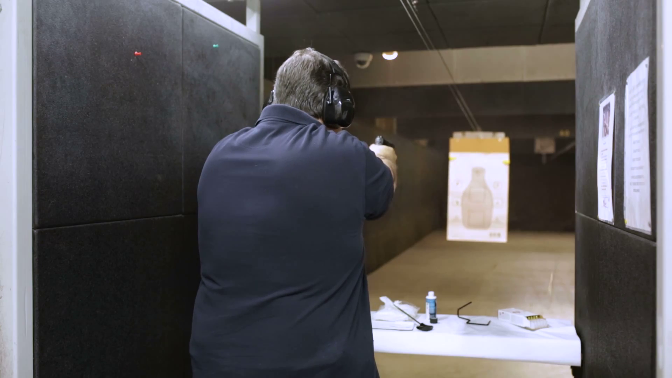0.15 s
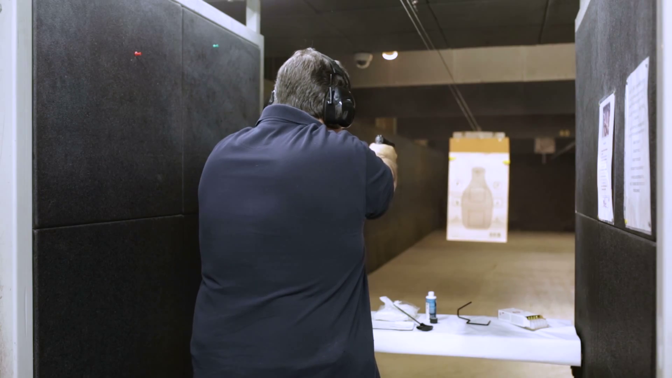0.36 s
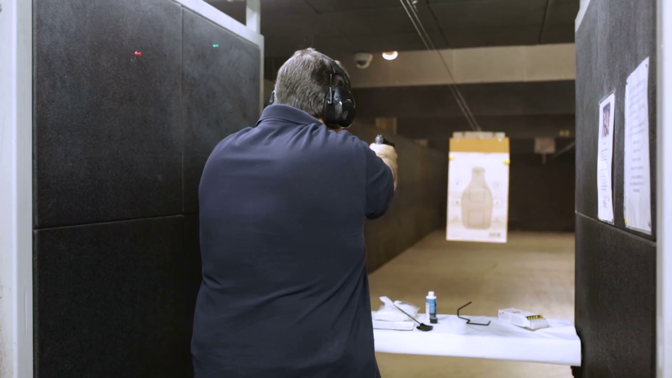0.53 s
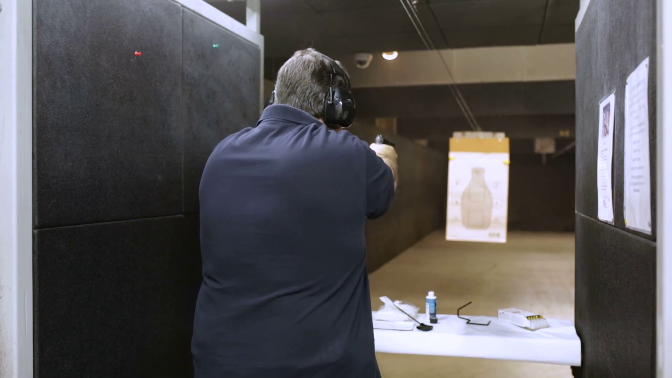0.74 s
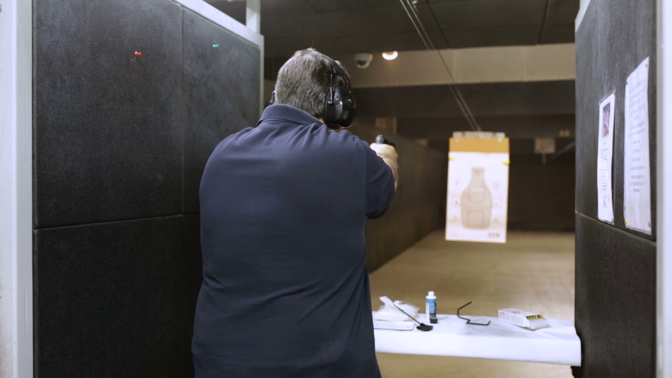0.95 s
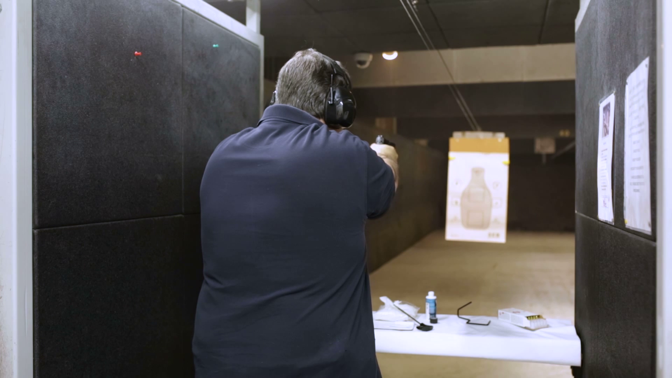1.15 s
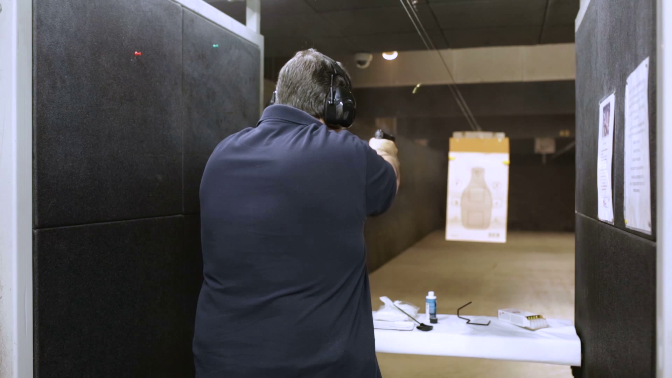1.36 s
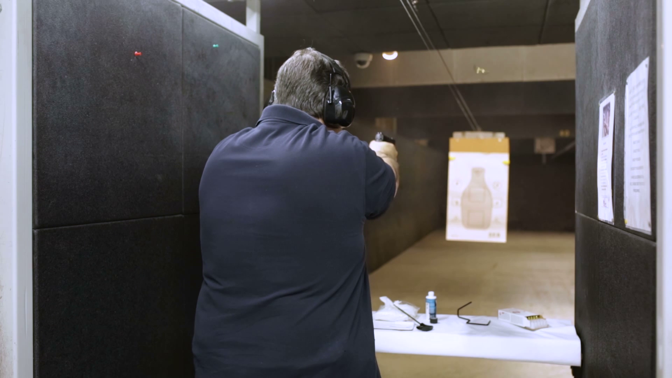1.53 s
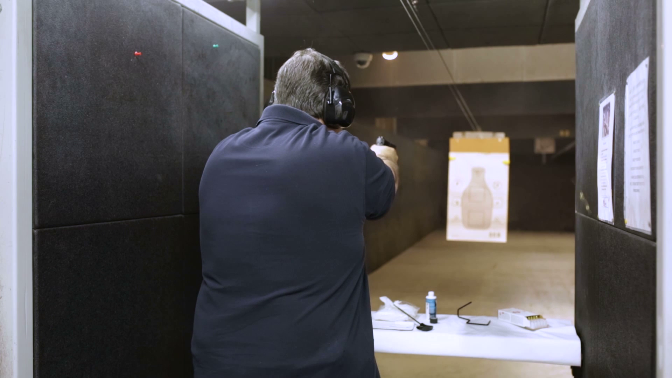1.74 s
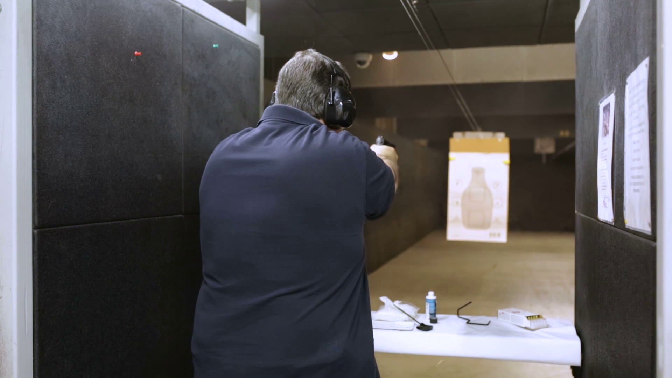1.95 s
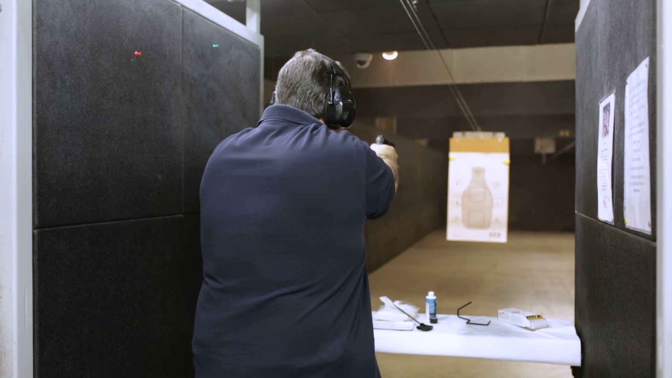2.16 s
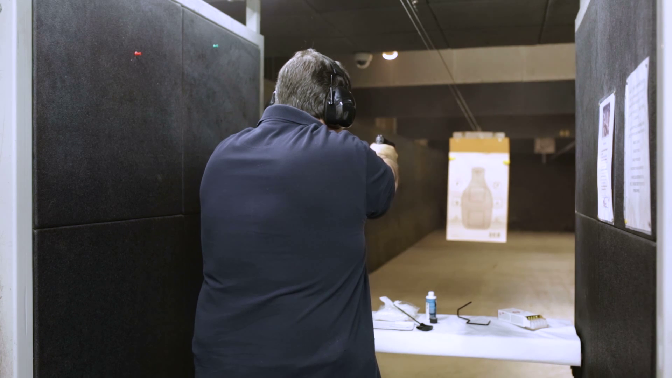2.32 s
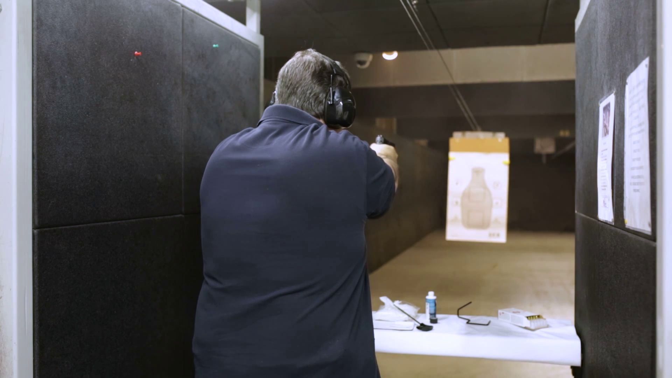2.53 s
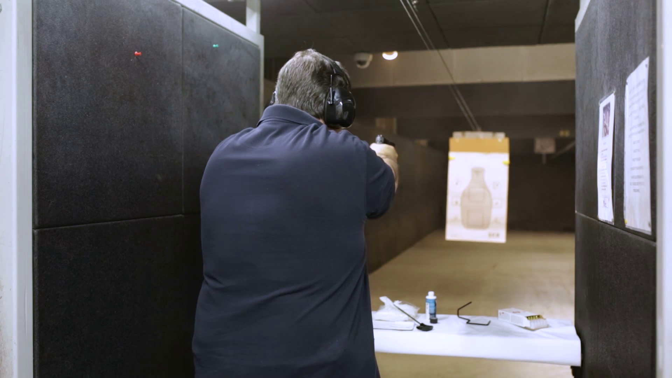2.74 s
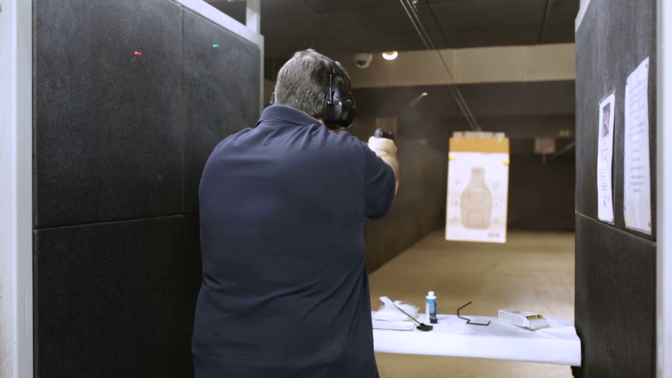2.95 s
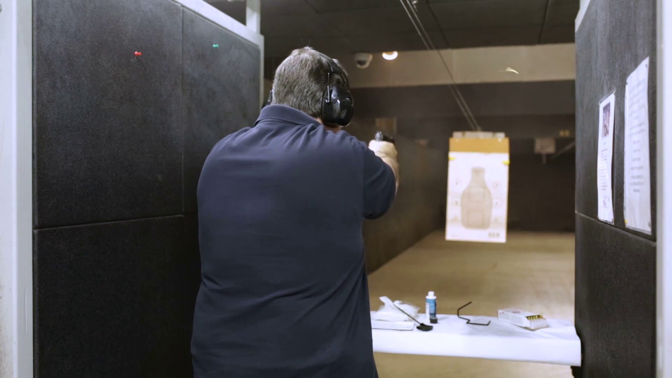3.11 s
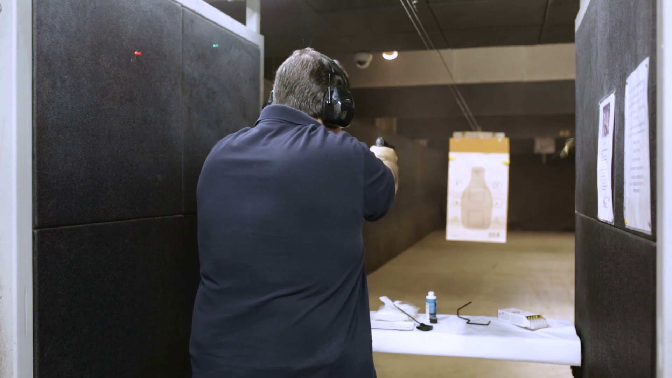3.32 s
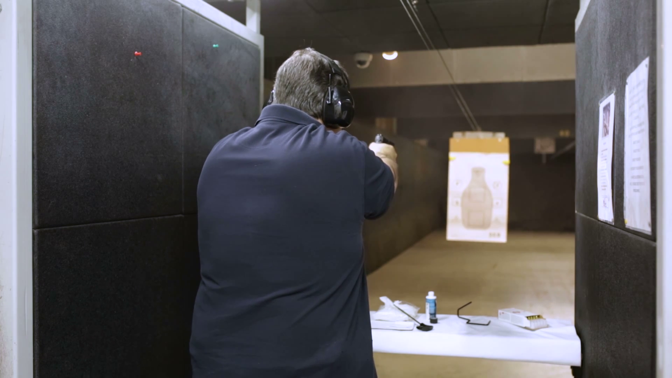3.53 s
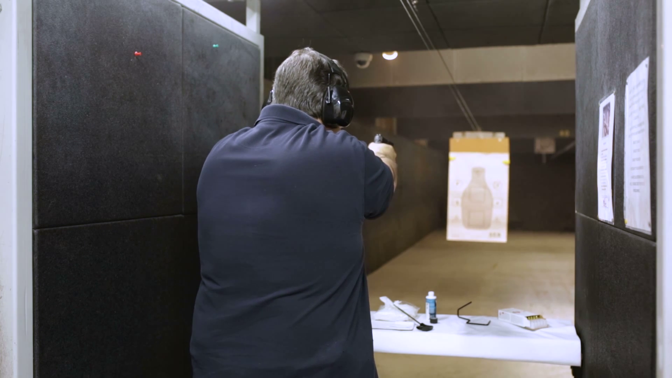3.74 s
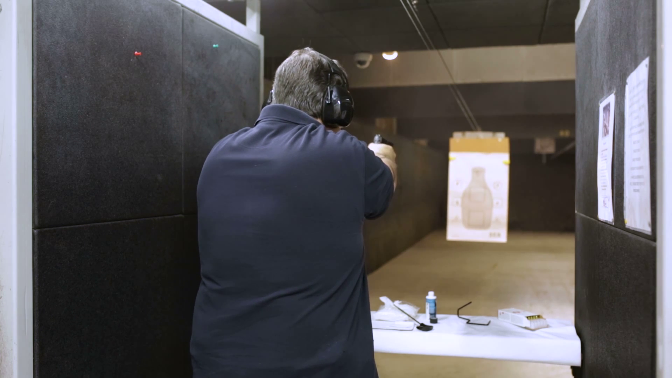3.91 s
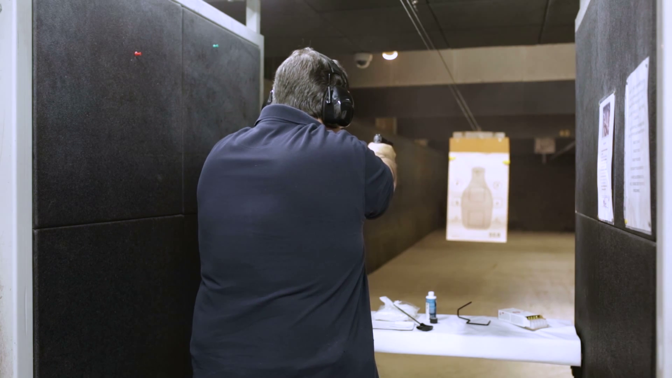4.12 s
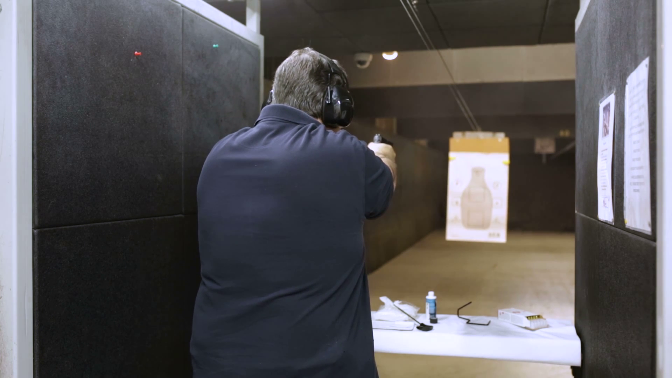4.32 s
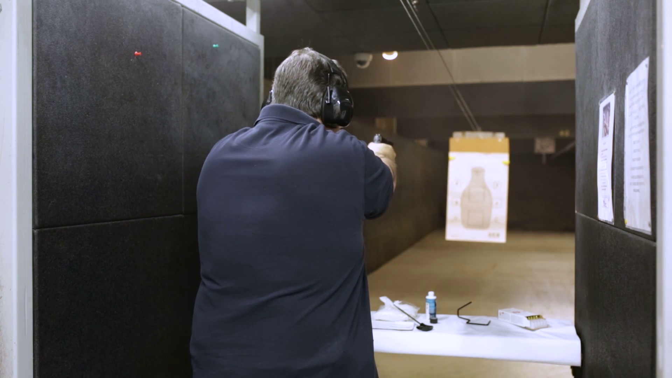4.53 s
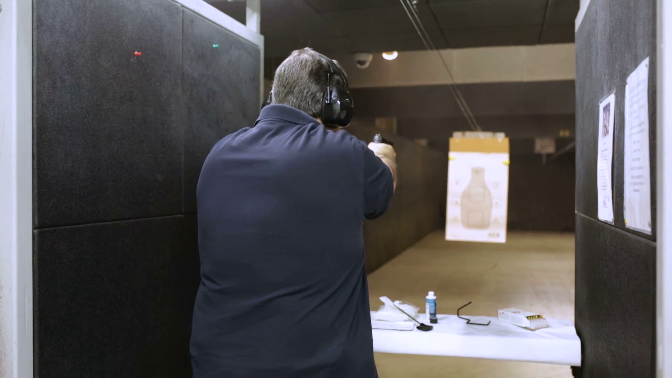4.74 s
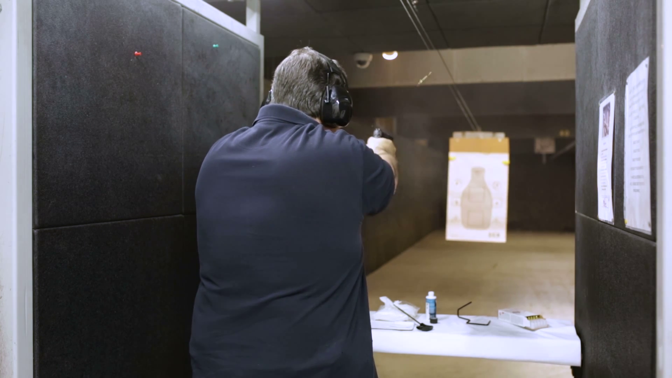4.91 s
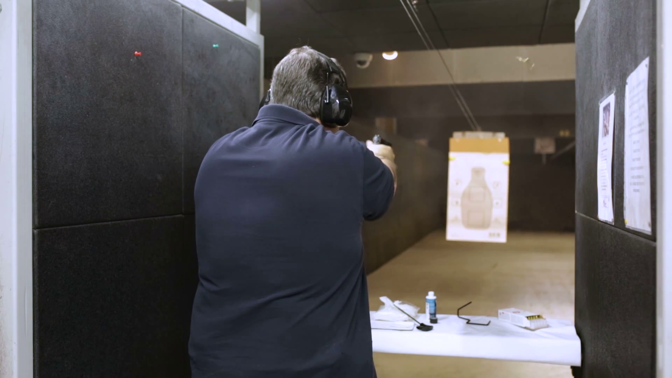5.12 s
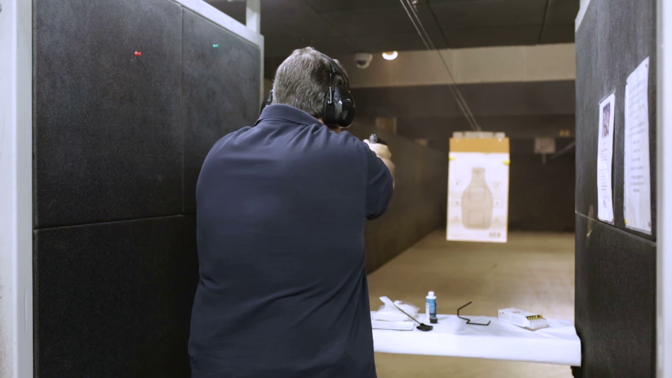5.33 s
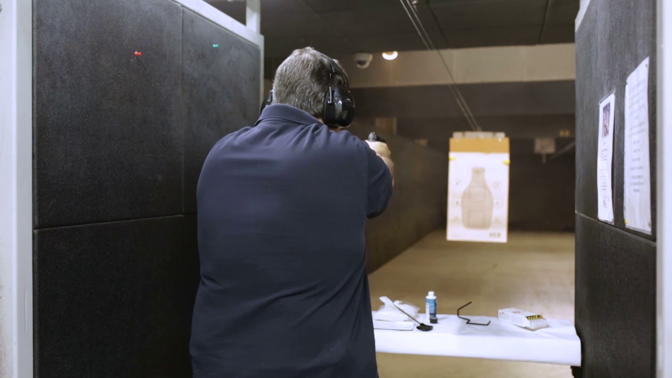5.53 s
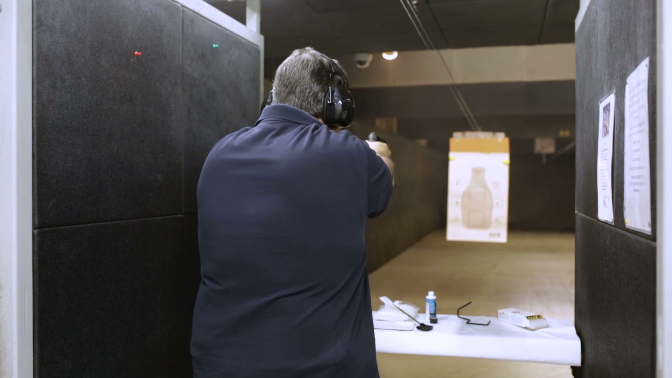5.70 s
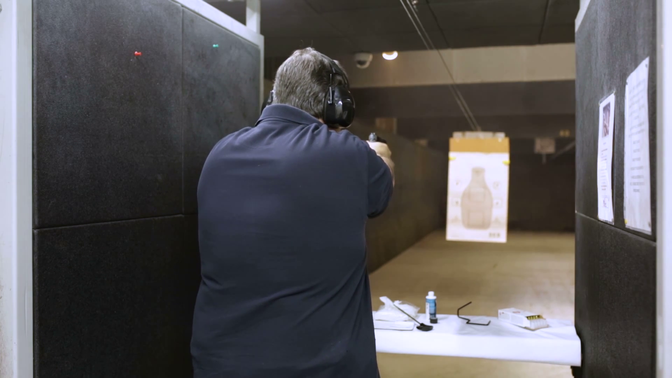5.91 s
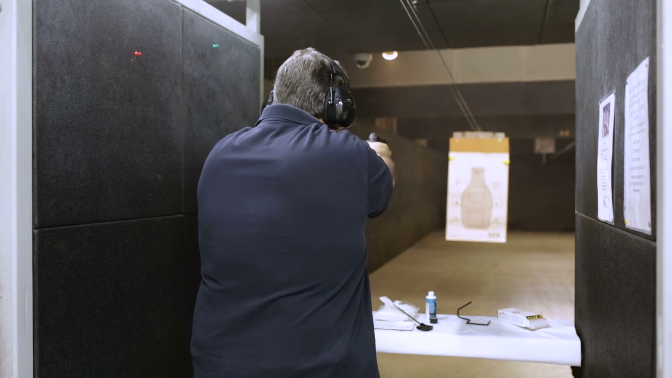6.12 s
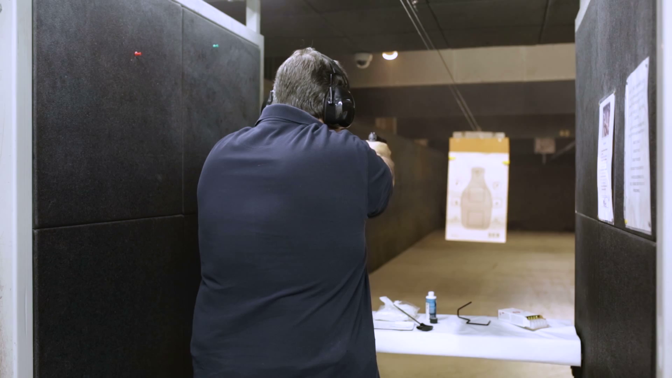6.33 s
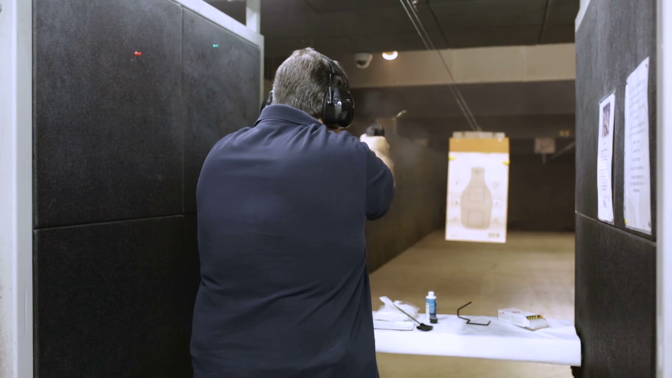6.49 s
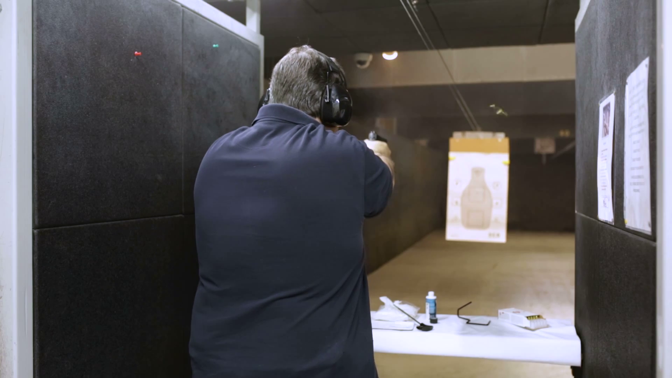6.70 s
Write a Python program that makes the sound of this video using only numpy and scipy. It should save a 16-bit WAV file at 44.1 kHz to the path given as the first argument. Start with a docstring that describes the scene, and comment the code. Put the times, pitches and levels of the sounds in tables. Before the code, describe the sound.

Single pistol shots boom and roar through an indoor concrete range, spent brass clattering and pinging between them over a low ventilation hum.

```python
"""Indoor pistol range, microphone in a booth: the first of five shots is already ringing out at the start.
Between the blasts, spent brass clatters and pings on the partition and the floor: noise bursts and beating tones.
Four more shots follow; each returns as noise from the booth, then from the concrete hall, over its standing waves.
The ventilation rushes and hums throughout: shaped noise with duct resonances.
Every blast overloads the microphone, and a limiter with look-ahead evens out the roar."""
import sys
import numpy as np
from scipy import signal
from scipy.fft import rfft, irfft, next_fast_len
from scipy.io import wavfile
from scipy.ndimage import uniform_filter1d

SR = 44100
rng = np.random.default_rng(int(sys.argv[2]) if len(sys.argv) > 2 else 0)


def persist_wave(psi):
    """Save psi, clipped to +-1, as 16-bit WAV."""
    counts = np.round(np.clip(psi, -1, 1) * 32767).astype(np.int16)
    wavfile.write(sys.argv[1], SR, np.atleast_2d(counts).T)


N = 298116

# shots fired: [t/s, relative level/dB]
BLASTS = [(-0.34, -1.3), (1.3393, -0.57), (2.947, -0.14), (4.8754, -0.9), (6.5194, 0.3)]
# cases tumbling onto the floor:
# [t/s of the rim's strike, clatter level/dB, clatter f/Hz, hiss level/dB, ring level/dB], levels before the mix
FLOOR_LANDINGS = [(0.5619, -34, 5400, -50, -57), (0.909, -32.5, 4620, -61, -32.5),
                  (2.556, -34, 4910, -53, -39.5), (2.901, -35.5, 4760, -62.5, -45.5),
                  (3.888, -23, 4680, -42.5, -33.5), (4.271, -39.5, 4850, -63, -36.5),
                  (4.657, -44, 4950, -79, -45), (5.7695, -32.5, 5200, -54, -46.5),
                  (6.273, -31, 5430, -51, -45.5)]
# cases rebounding with one sharp tap: [t/s, clatter level/dB, clatter f/Hz, hiss level/dB], levels before the mix
SHARP_TAPS = [(1.0684, -30, 4820, -74), (1.168, -47.5, 4770, -58), (1.325, -43, 5260, -73.5),
              (2.11, -60, 4430, -53.5), (4.4752, -29.5, 5510, -51.5), (4.8503, -33.5, 5200, -79),
              (5.333, -35.5, 5070, -45)]


def from_db(db):
    """Decibels to gain."""
    return 10 ** (np.asarray(db) / 20)


def rms_one(x):
    """Scale to unit rms."""
    return x / np.sqrt(np.mean(x ** 2) + 1e-20)


def at_hz(table, hz, axis=1):
    """Read one column of a table on a log-frequency axis."""
    table = np.array(table)
    return np.interp(np.log(hz), np.log(table[:, 0]), table[:, axis])


def butter(x, hz, kind, order=2):
    """Causal Butterworth filter."""
    return signal.sosfilt(signal.butter(order, hz, kind, fs=SR, output="sos"), x)


def dying(t, t60):
    """Exponential decay: falls by 60 dB in t60 seconds after t = 0."""
    return np.exp(-np.log(1000) * np.maximum(t, 0) / t60)


def add(out, s, sound):
    """Mix a sound in at time s, trimmed to the length of the take."""
    start = int(round(s * SR))
    first, last = max(start, 0), min(start + len(sound), N)
    if last > first:
        out[first:last] += sound[first - start:last - start]


def resonant_noise(size, hz, width_hz, order=2):
    """Noise through one resonance, already rung up, unit rms."""
    run_in = SR // 4
    noise = rng.standard_normal(size + run_in)
    band = [hz - width_hz / 2, hz + width_hz / 2]
    return rms_one(butter(noise, band, "band", order=order)[run_in:])


def coloured_noise(size, table):
    """Steady noise with the table's level per Hz."""
    padded = next_fast_len(size)
    hz = np.maximum(np.fft.rfftfreq(padded, 1 / SR), 1)
    spectrum = rfft(rng.standard_normal(padded)) * from_db(at_hz(table, hz))
    return irfft(spectrum, padded)[:size] * np.sqrt(SR / 2)


def drift(size, hz):
    """Low-passed random wobble of spread 1."""
    return rms_one(butter(rng.standard_normal(size + SR // 4), hz, "low")[-size:])


def shots(shared=0.62, clump_db=1.0, clump_hz=45):
    """Each blast returns as dense reflections from the booth, then from the hall, over its standing waves."""
    # first bright reflections inside the booth: [f/Hz, level/dB per Hz]
    booth = [(60, -44.5), (130, -16), (500, -12), (1500, -7), (3000, -1.5), (6000, -8), (15000, -26.5)]
    booth_t60_s = 0.077
    # standing waves between the walls that stand out of the roar: [f/Hz, width/Hz, level/dB, t60/s]
    hall_modes = [(84, 8, -19.5, 1.7), (118.4, 4.8, -4, 1.08), (187.55, 4.7, -7.5, 1.25),
                  (330.2, 24, -8.5, 1.36), (406.4, 4.6, -4, 0.93), (648, 11, -2.5, 0.97),
                  (732, 21, -8.5, 1.29), (874, 13, -4, 0.77), (1091, 3.3, -10, 0.65),
                  (1539, 12, -23.5, 1.47)]
    t = np.arange(int(1.8 * SR)) / SR
    out = np.zeros(N)

    def reflections():
        near = coloured_noise(len(t), booth) * dying(t, booth_t60_s)
        diffuse = hall_noise(len(t)) + near
        bass = butter(diffuse, 1500, "low", order=1)
        clumps = from_db(clump_db * drift(len(t), clump_hz) * dying(t, 9.0))   # treble echoes arrive in bunches
        return bass + clumps * (diffuse - bass)

    same_paths = reflections()   # muzzle and microphone barely move, so part of the pattern repeats
    for s, db in BLASTS:
        modes = np.zeros(len(t))
        for hz, width, level, t60 in hall_modes:
            modes += from_db(level) * resonant_noise(len(t), hz, width) * dying(t, t60)
        echoes = np.sqrt(shared) * same_paths + np.sqrt(1 - shared) * reflections()
        add(out, s, from_db(db) * (echoes + modes))
    return out


def hall_noise(size, far_db=-27.5):
    """Diffuse reverberation, each frequency dying at its own rate; the far end of the range lingers faintly."""
    # the hall's answer to a blast: [f/Hz, level/dB per Hz, t60/s]
    hall = [(35, -63, 1.4), (60, -44.5, 1.4), (97, -29, 1.63), (178, -17, 1.31), (357, -16, 1.066),
            (760, -13.5, 0.92), (1103, -17, 0.92), (1860, -23, 0.77), (2880, -18.5, 0.68),
            (3530, -25, 0.64), (4700, -24, 0.51), (8400, -29, 0.32), (15000, -35.5, 0.35)]
    hz, _, cells = signal.stft(rng.standard_normal(size), SR, nperseg=2048)
    t = np.arange(cells.shape[1]) * 1024 / SR   # frames are half a window apart
    hz = np.maximum(hz, 1)[:, None]
    t60 = at_hz(hall, hz, axis=2)
    decay = dying(t, t60) + from_db(far_db) * dying(t, np.minimum(1.71 * t60, 1.3))
    shaped = cells * from_db(at_hz(hall, hz)) * decay
    return signal.istft(shaped, SR)[1][:size] * np.sqrt(SR / 2)


def cases(clatter_width_hz=1500, clink_width_hz=480, ring_width_hz=170, clatter_db=-4.5, clink_db=-9.0,
          hiss_db=9.0, ring_db=2.0, ring_echo_db=0.5, split_hz=70):
    """A case lands with a broad clatter and a narrower clink; its mouth rings on two close modes that beat."""
    lead = .04   # room for the swell before each contact, s
    t = np.arange(int(.7 * SR)) / SR - lead
    out = np.zeros(N)
    for s, length, body_db, body_hz, scrape_db, ping_db in contacts():
        ping_hz = case_note(s)
        clatter = resonant_noise(len(t), body_hz, clatter_width_hz, order=1)
        clatter = butter(clatter, [body_hz - 2150, 1.04 * body_hz], "band")
        clink = resonant_noise(len(t), body_hz * 1.015, clink_width_hz)
        hiss = butter(rng.standard_normal(len(t)), 2200, "high")
        hiss = rms_one(butter(hiss, 14000, "low", order=1))
        split = split_hz * rng.uniform(.5, 1.3)
        phase = rng.uniform(0, 2 * np.pi)
        pair = np.sin(2 * np.pi * ping_hz * t) + .5 * np.sin(2 * np.pi * (ping_hz + split) * t + phase)
        ring_echo = resonant_noise(len(t), ping_hz, ring_width_hz)   # the room blurs the note
        layers = [(clatter, body_db + clatter_db, 0.6, -12.0),   # sound, level/dB, tail t60/s, tail level/dB
                  (clink, body_db + clink_db, 0.43, -6.0),
                  (hiss, scrape_db + hiss_db, 0.35, -9.5),
                  (pair, ping_db + ring_db, 0.41, 0.0),
                  (ring_echo, ping_db + ring_echo_db, 0.38, 5.5)]
        for sound, db, t60, tail_db in layers:
            add(out, s - lead, from_db(db) * sound * rattle(t, length, t60, tail_db))
    return out


def contacts():
    """Every touch of brass: (t/s, rattle length/s, clatter/dB, clatter f/Hz, hiss/dB, ring/dB)."""
    # cases skipping lightly with a tinkle: [t/s, length of the run/s, ring level/dB before the mix]
    skips = [(0.101, 0.05, -54.5), (1.718, 0.35, -44), (3.498, 0.05, -56), (5.17, 0.05, -59)]
    tumble_s, tumble_lead_s = 0.011, 0.016   # rattle length setting; its lead on the rim's strike
    tap_s, tap_ring_db = 0.0014, -54
    hop_s, hop_keeps, hop_loss_db = 0.122, 0.82, 2.3   # first hop; share of it left for the next; loss per hop
    skip_s, skip_clatter_hz = 0.0045, 5000
    skip_clatter_db, skip_hiss_db = -14, -24   # relative to the ring
    rows = [(s - tumble_lead_s, tumble_s, *sound) for s, *sound in FLOOR_LANDINGS]
    rows += [(s, tap_s, *sound, tap_ring_db) for s, *sound in SHARP_TAPS]
    for start, run_s, first_db in skips:
        s = start
        for hop in range(4):   # each hop is shorter and weaker than the last
            db = first_db - hop_loss_db * hop
            if s < start + run_s:
                rows.append((s, skip_s, db + skip_clatter_db, skip_clatter_hz, db + skip_hiss_db, db))
            s += hop_s * hop_keeps ** hop
    return rows


def case_note(s):
    """The case that is falling at time s is the one thrown out by the latest shot."""
    # note on which each spent case rings, in the order of the shots: [f/Hz]
    case_notes = [11520, 11545, 11600, 11460]
    return [hz for (fired, _), hz in zip(BLASTS, case_notes) if fired < s][-1]


def rattle(t, length, t60, tail_db):
    """Envelope of a case's burst of contacts around t = 0 and of the tail that it leaves."""
    swell = 1 / (1 + np.exp(np.clip(-4 * t / length - 1.5, -50, 50)))
    return swell * (dying(t, 13 * length + 0.012) + from_db(tail_db) * dying(t, t60))


def ticks(crack_db=-9.0, crack_t60=0.0033, clink_hz=5250, clink_t60=0.0075):
    """The rim meets concrete with one dry, bright crack and a very short clink."""
    t = np.arange(int(.03 * SR)) / SR
    out = np.zeros(N)
    for s, db in rim_strikes():
        rise = 1 - dying(t, .001)
        clink = np.sin(2 * np.pi * clink_hz * rng.uniform(.96, 1.04) * t) * dying(t, clink_t60)
        crack = rms_one(butter(rng.standard_normal(len(t)), 3900, "high")) * dying(t, crack_t60)
        add(out, s, from_db(db) * rise * (clink + from_db(crack_db) * crack))
    return out


def rim_strikes(softest_db=-53.5, loudest_db=-18):
    """The harder a contact, the louder its rim strikes, up to a limit; soft ones do not strike: (t/s, level/dB)."""
    # contacts, rim level/dB at a hardness of -45 dB, dB per dB of hardness
    kinds = [(FLOOR_LANDINGS, -22, 0.9), (SHARP_TAPS, -18.5, 1.0)]
    rows = []
    for table, rim_db, slope in kinds:
        for s, clatter_db, _, hiss_db, *_ in table:
            hardness_db = (clatter_db + hiss_db) / 2
            if hardness_db > softest_db:
                rows.append((s, min(rim_db + slope * (hardness_db + 45), loudest_db)))
    return rows


def ventilation():
    """Steady rush of air, with duct resonances and fan tones as narrow bands of noise."""
    # rush of the ventilation: [f/Hz, level/dB per Hz]
    air = [(30, -86), (45, -91.5), (68, -60), (95, -70.5), (125, -62), (170, -69.5), (250, -74.5),
           (420, -84.5), (900, -88.5), (1400, -95.5), (2200, -103), (5000, -112), (8000, -117),
           (15000, -120)]
    # duct resonances and fan tones: [f/Hz, width/Hz, level/dB]
    ducts = [(118.26, 4.2, -50), (677, 38, -60.5), (896, 25, -71.5), (1007, 16, -64), (1510, 160, -69)]
    out = coloured_noise(N, air)
    for hz, width, db in ducts:
        out += from_db(db) * resonant_noise(N, hz, width)
    return out


def scene():
    """Shots, brass and air at the microphone."""
    return (shots() + cases() + ticks() + ventilation())[None]


def mean_size(x, seconds, axis=0):
    """Mean magnitude over the moment just past (axis 0) or just ahead (axis 1)."""
    size = 2 * int(seconds * SR / 2) + 1
    return uniform_filter1d(np.abs(x), size, origin=(size // 2) * (1 - 2 * axis))


def limiter(x, ceiling_db=-20.0, slope=0.72, release_db_per_s=75, knee=0.042):
    """Looks ahead and turns down before each blast, eases the sudden jump in, then recovers."""
    coming_db = 20 * np.log10(mean_size(x, .045, axis=1) + 1e-9)
    over = np.maximum(coming_db - ceiling_db, 0) * slope
    release = release_db_per_s * np.arange(N) / SR
    held = np.maximum.accumulate(over + release) - release   # gain reduction/dB, released no faster than this
    past, ahead = mean_size(x, .021), mean_size(x, .002, axis=1)
    ease = np.minimum((past + knee) / (.72 * ahead + knee), 1)
    return x * ease * from_db(-uniform_filter1d(held, size=221))


def record(dry, top=1.17, bias=0.029, cutoff_hz=15800):
    """The microphone clips; bass cuts make the flat tops droop; then the limiter and the treble cut-off."""
    x = dry[0] / top + bias   # the bias makes the clipping lopsided
    clipped = top * (x / (1 + x ** 6) ** (1 / 6) - bias)
    drooping = butter(butter(clipped, 81, "high", order=1), 69, "high", order=3)
    limited = limiter(butter(drooping, 11000, "low", order=1))
    return signal.sosfilt(signal.ellip(10, .3, 80, cutoff_hz, fs=SR, output="sos"), limited)[None]


dry = scene()
out = record(dry)
persist_wave(out)
```